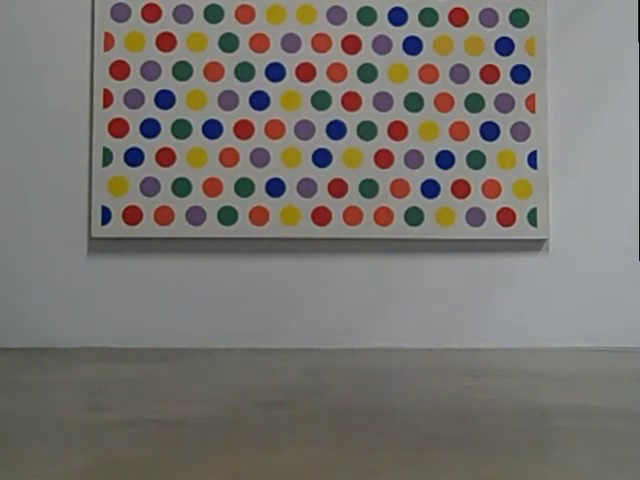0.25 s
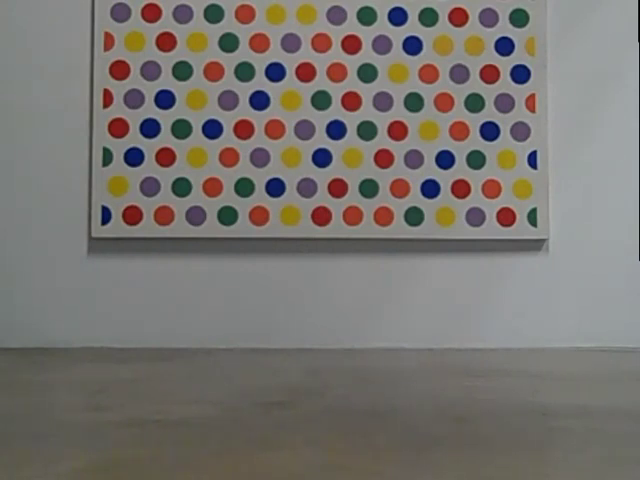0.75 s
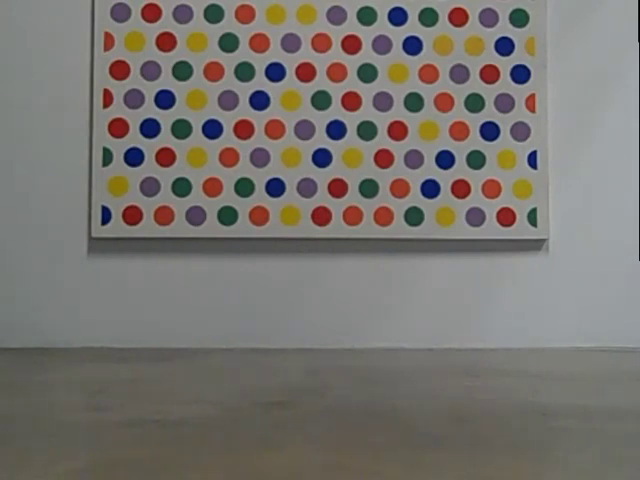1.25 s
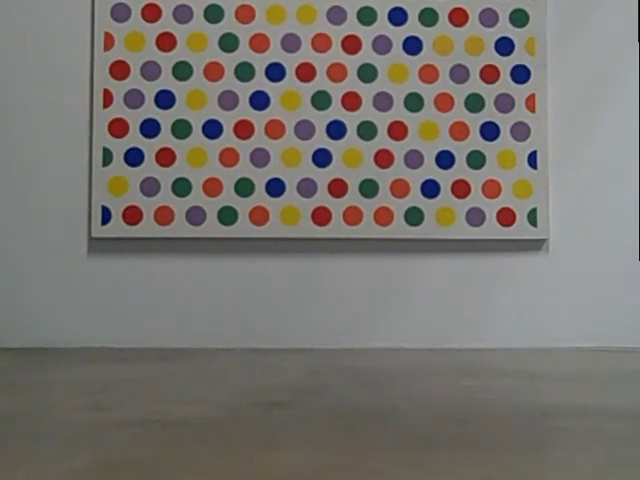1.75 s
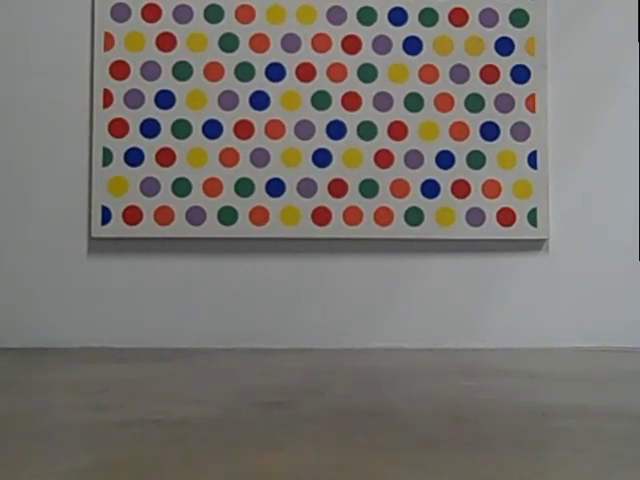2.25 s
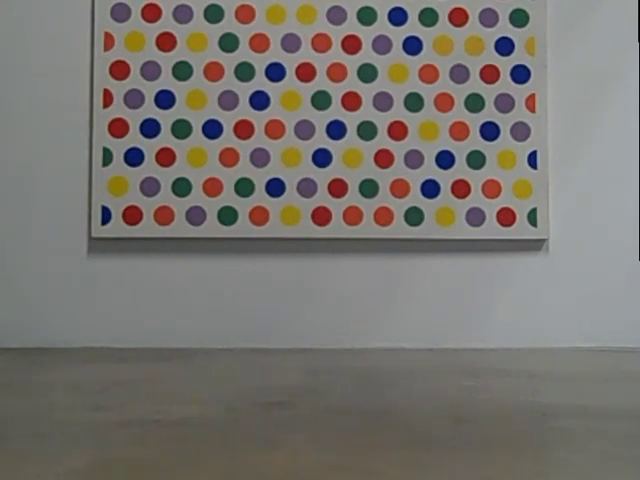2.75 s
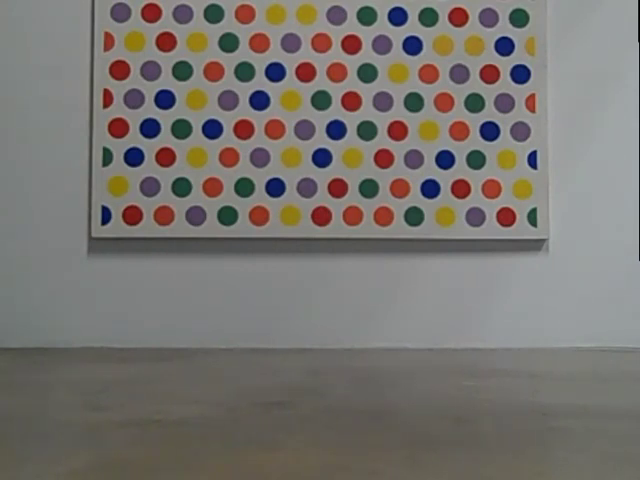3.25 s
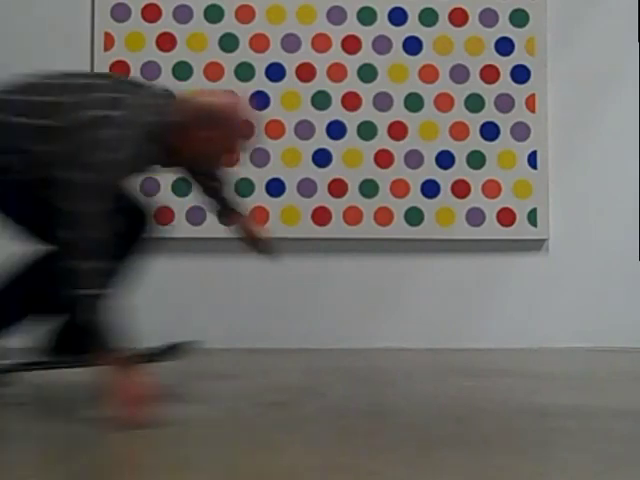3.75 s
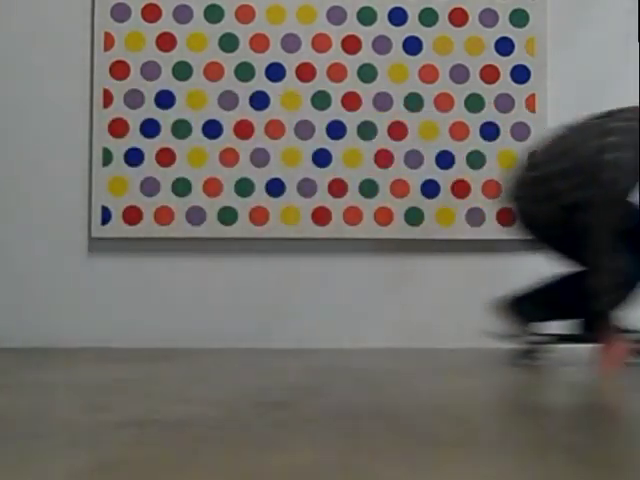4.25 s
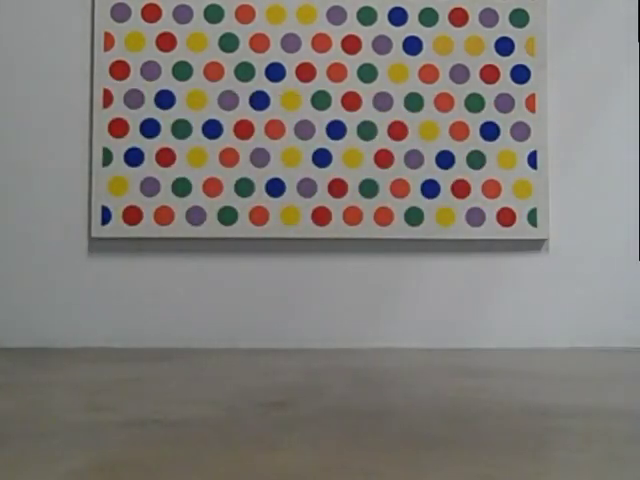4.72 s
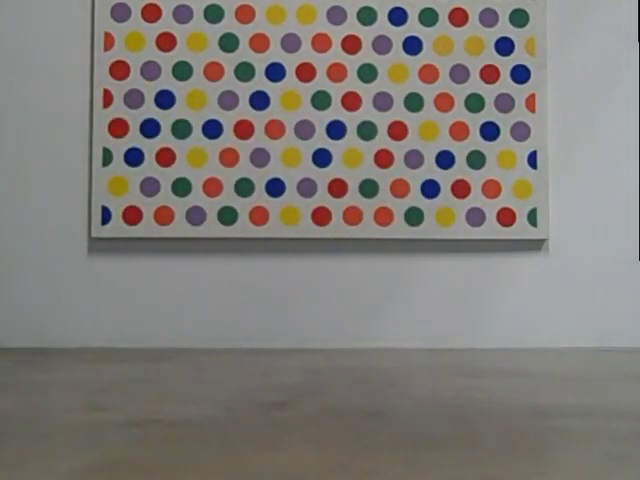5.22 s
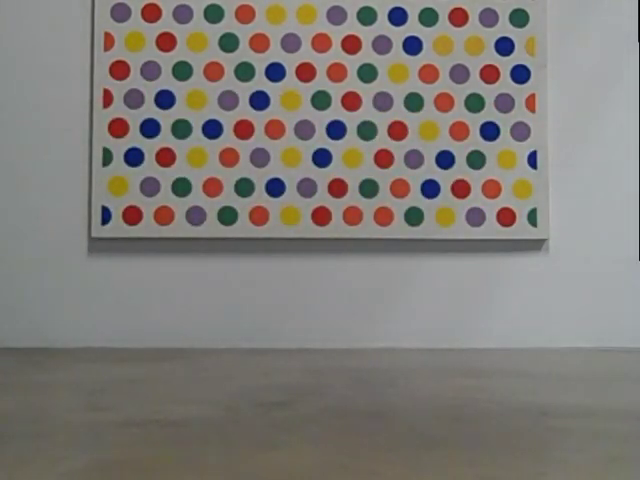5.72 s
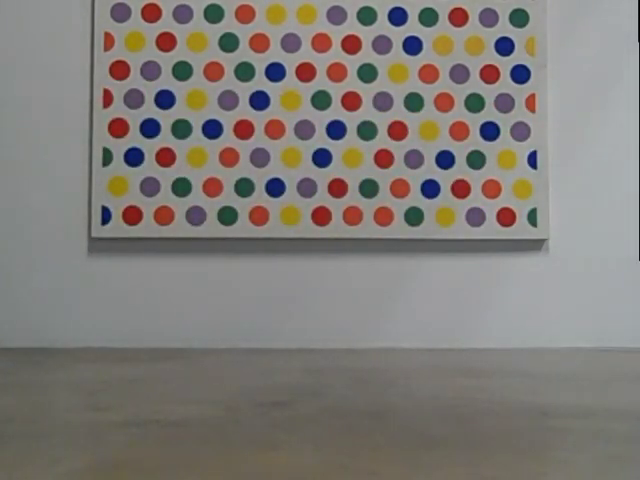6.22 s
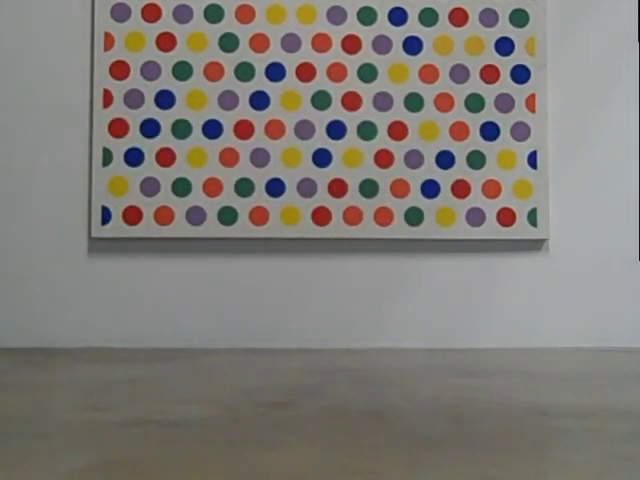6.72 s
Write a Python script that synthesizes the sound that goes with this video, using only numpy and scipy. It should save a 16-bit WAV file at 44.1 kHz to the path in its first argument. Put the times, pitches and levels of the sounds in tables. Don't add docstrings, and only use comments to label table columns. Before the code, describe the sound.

A large, bare hall with a polished concrete floor murmurs quietly and low. At 0.5 s a soft bump precedes faint skateboard rolling, and a dry axle gives a thin, fluttering, high squeak near 0.9 s. Light taps come around 1.75 s, then from 2.0 to 2.35 s the deck is knocked and set down in a dense, loud wooden clatter, with a second squeak and a surge of rolling whirr. A sole scuffs briefly at 2.6 s. Clacks at about 3.0-3.2 s lead into a short, harsh rubber skid, trailing off lightly. The wheels then roll with a lighter drone and gritty hiss until 4.7 s, when they clack twice over a floor joint with a low boom. The whirr swells, then drops gradually in pitch and fades toward 7 s. Close stereo microphones catch sharp detail and a long, ringing echo.

```python
import sys
import numpy as np
from scipy import signal
from scipy.io import wavfile

SR = 44100
rng = np.random.default_rng(int(sys.argv[2]) if len(sys.argv) > 2 else 0)


def field_ratio(decibels):
    return 10 ** (np.asarray(decibels, dtype=float) / 20)


def file_out(sig):
    cols = np.atleast_2d(sig).T
    lim = np.clip(cols, -1, 1)
    pcm = np.round(lim * 32767).astype(np.int16)
    wavfile.write(sys.argv[1], SR, pcm)


N = 307630
SECONDS = np.arange(N) / SR
JOINT_S = 4.71


def rms_one(x):
    return x / np.sqrt(np.mean(x ** 2) + 1e-20)


def in_time(rows):
    s, *columns = np.transpose(rows)
    return [np.interp(SECONDS, s, c) for c in columns]


def gate(start_s, end_s):
    return (SECONDS >= start_s) & (SECONDS <= end_s)


def at_hz(points, hz):
    f, values = np.array(points).T
    return np.interp(np.log(hz), np.log(f), values)


def swell(s, db, attack_s, hold_s, fall_db_per_s):
    rise = 30 * np.maximum(s - SECONDS, 0) / max(attack_s, .003)
    fall = fall_db_per_s * np.maximum(SECONDS - s - hold_s, 0)
    return db - rise - fall


def drift(rate_hz):
    r = np.exp(-2 * np.pi * rate_hz / SR)
    smooth = signal.lfilter([1], [1, -2 * r, r * r], rng.standard_normal(N + SR))
    return rms_one(smooth[SR:])


def resonances(x, modes):
    out = 0
    for k, (hz, width, db) in enumerate(modes):
        r = np.exp(-np.pi * width / SR)
        b = field_ratio(db) * (1 - r * r) / 2 * np.array([1, 0, -1])
        a = [1, -2 * r * np.cos(2 * np.pi * hz / SR), r * r]
        out = out + (-1) ** k * signal.lfilter(b, a, x + 1e-18)
    return out


def grains(per_s, spread_db):
    sizes = field_ratio(spread_db * np.minimum(rng.exponential(1, N), 4)) * rng.choice([-1, 1], N)
    return rms_one(sizes * (rng.random(N) < per_s / SR))


def bands(size, shape):
    # f/Hz, likeness/1
    likeness = [(60, 0.916), (150, 0.98), (370, 1), (930, 0.93), (2330, 0.66), (5820, 0.026), (14500, 0.1)]
    out, edges = 0, 25 * 2 ** np.arange(0, 9.6, .5)
    white = rng.standard_normal((2, 2, size))
    for k, (low, high) in enumerate(zip(edges, edges[1:])):
        band = signal.butter(2, [low, high], "band", fs=SR, output="sos")
        mid, side = signal.sosfilt(band, white[k % 2])
        hz = np.sqrt(low * high)
        alike = np.clip(at_hz(likeness, hz), 0, 1)
        out = out + shape(hz) * (np.sqrt(1 + alike) * mid + np.sqrt(1 - alike) * side * [[1], [-1]])
    return out


def spread(mid, side):
    high_pass = signal.butter(2, 2200, "high", fs=SR, output="sos")
    side = field_ratio(-1.0) * signal.sosfilt(high_pass, side) + field_ratio(-26) * side
    return np.array([mid + side, mid - side])


def air_tone():
    # f/Hz, level/dB (per Hz)
    air_colour = [(15, -45), (25, -37), (65, -8.5), (237, -12), (392, -7), (2200, -24), (7030, -54),
                  (14000, -60.5)]
    return field_ratio(-47) * rms_one(bands(N, lambda hz: field_ratio(at_hz(air_colour, hz))))


def footfall():
    s, db, hz, half_s = 7, -55, 32, 0.2
    return field_ratio(db) * np.exp(-((SECONDS - s) / half_s) ** 2) * np.sin(2 * np.pi * hz * SECONDS)


def boom():
    # f/Hz, width/Hz, level/dB
    slab = [(62.5, 50, -2.5), (92, 46, 0.5)]
    level = field_ratio(swell(JOINT_S, -42, attack_s=.03, hold_s=0.2, fall_db_per_s=18))
    return level * rms_one(resonances(resonances(rng.standard_normal(N), slab), slab))


def squeaks():
    # t/s (peak), level/dB, swell/s, fall/(dB per s)
    axle_squeaks = [
        (.86, -33.5, 0.117, 51),
        (2.14, -37, .12, 53),
    ]
    start_hz, full_hz, swell_db = 3200, 3265, 5.5
    level, climb = 0, 0
    for s, db, swell_s, fall in axle_squeaks:
        rise = np.clip(1 + (SECONDS - s) / swell_s, 0, 1)
        level = level + field_ratio(swell(s - swell_s, db, 0.061, swell_s, fall) - swell_db * (1.5 - rise))
        climb = np.where(SECONDS > s - 2 * swell_s, rise, climb)
    hz = start_hz + (full_hz - start_hz) * climb
    phase = 2 * np.pi * np.cumsum(hz * (1 + .012 * drift(130))) / SR
    flutter = field_ratio(3 * drift(110))
    return level * flutter * (np.sin(phase) + field_ratio(-22.5) * np.sin(2 * phase))


def scuffs():
    # t/s, level/dB, attack/s, hold/s
    drags = [
        (1.927, -42, .08, 0.035),
        (2.608, -34.5, 0.064, .04),
        (2.977, -39, 0.14, .005),
        (3.08, -34.5, .01, 0.0089),
        (3.139, -33, 0.038, 0.0096),
        (3.177, -19.5, 0.015, .008),
        (3.213, -18.5, 0.031, 0.1),
        (3.367, -43, .02, .02),
        (3.527, -38.5, 0.07, 0.1),
    ]
    # f/Hz, width/Hz, level/dB
    sole = [(1710, 420, 3.5), (4050, 3400, -4.5), (6700, 13200, -2.5), (11400, 2700, 2.5)]
    level = sum(field_ratio(swell(*row, fall_db_per_s=375) + 4.0) for row in drags)
    mid, side = (level * rms_one(resonances(grains(12000, spread_db=4.5), sole)) for port in range(2))
    return spread(mid, 0.5 * side)


def skid():
    # multiple/1, level/dB
    orders = [(1, -1), (2, -4), (3, -2.5), (4, -23), (5, -13.5), (6, -20.5)]
    # f/Hz, width/Hz, level/dB
    torn = [(490, 120, -13), (1098, 140, 5), (1626, 170, 4.5), (2460, 370, -9), (12100, 2700, -25.5)]
    start_s, peak_s, drag_end_s = 3.18, 3.255, 4.62
    slips_hz = np.where(SECONDS < 3.213, 425, 518)
    phase = 2 * np.pi * np.cumsum(slips_hz * (1 + .025 * drift(80))) / SR
    stack = 0
    for k, db in orders:
        stack = stack + field_ratio(db + 4 * drift(60)) * np.sin(k * phase)
    noise = field_ratio(-1.5) * rms_one(resonances(rng.standard_normal(N), torn))
    bite_db = swell(start_s, -14, attack_s=0.024, hold_s=.19, fall_db_per_s=461)
    bite = field_ratio(bite_db - 80 * abs(SECONDS - peak_s))
    drag = gate(start_s, drag_end_s) * field_ratio(-34.5 - 4 * (SECONDS - start_s))
    return (bite + drag) * (stack + noise)


def rolling(rumble_db, drone_db, hiss_db):
    # f/Hz, width/Hz, level/dB
    bending = [(86.2, 79, -4.5), (116.3, 83, 0), (184, 80, -0.5), (245.3, 133, -2), (323, 116, -2.5)]
    # f/Hz, width/Hz, level/dB
    wheels = [(372, 141, -7), (520, 80, -0.5), (700, 127.6, -3.5), (1000, 333, -8.5), (1333, 338, -9),
              (1730, 372, -12), (2420, 1405, -26.5)]
    # f/Hz, width/Hz, level/dB
    grit = [(3750, 667, -4), (6480, 8300, 0), (10860, 3400, 4.5)]
    rumble = rms_one(resonances(resonances(grains(1500, spread_db=2.5), bending), bending))
    drone = rms_one(resonances(grains(5000, spread_db=2.2), wheels))
    hiss = rms_one(resonances(grains(9000, spread_db=3.5), grit))
    return field_ratio(rumble_db) * rumble + field_ratio(drone_db) * drone + field_ratio(hiss_db) * hiss


def whirr(hz, level_db):
    phase = 2 * np.pi * np.cumsum(hz) / SR
    band, octave = [drift(90 * k) * np.sin(k * phase) + drift(90 * k) * np.cos(k * phase) for k in (1, 2)]
    speeding_up = np.clip(np.gradient(hz) * SR / 1000, 0, 1)
    return field_ratio(level_db) * (band + field_ratio(-12 + 7.5 * speeding_up) * octave)


def roll():
    # t/s, level/dB (drone), f/Hz (whirr)
    ride = [(0, -45.5, 520), (.5, -47.5, 520), (.7, -33, 520), (1.0, -36, 520), (1.3, -34.5, 520),
            (1.75, -37.5, 600), (1.98, -28, 1000), (2.3, -20, 802), (2.7, -29, 691.6), (3.05, -25.5, 681),
            (3.4, -42, 621), (3.75, -39.5, 640), (4.0, -33, 640), (4.62, -33.5, 655), (4.8, -30, 700),
            (5.4, -36, 683), (6.25, -38.5, 653.6), (6.98, -39, 623)]
    # t/s, level/dB, hold/s
    loaded = [
        (0.664, -41, 0.94),
        (1.88, -40.5, 0.98),
        (4.75, -37.5, 0.33),
        (5.5, -57, 1.5),
    ]
    # t/s, hold/s
    dusty = [
        (4.107, 0.58),
        (5.703, .4),
    ]
    drone_db, hz = in_time(ride)
    dust = sum(field_ratio(swell(s, 0, 0.11, hold_s, 200)) for s, hold_s in dusty)
    hiss_db = -60.5 + 1.06 * (drone_db + 34.5) + 4 * dust
    rumble_db = np.max([swell(s, db, 0.16, hold_s, 75) for s, db, hold_s in loaded], axis=0)
    whirr_db = drone_db - 5.5 - 26 * gate(3.3, 4.66)
    jolt_db = swell(JOINT_S, -26, attack_s=.03, hold_s=0.039, fall_db_per_s=24)
    whirr_db = np.maximum(whirr_db, jolt_db)
    flutter = drift(14.0)
    rumble_db = rumble_db + 1.2 * drift(8)
    levels = rumble_db, drone_db + 0.71 * flutter, hiss_db + 1.2 * flutter
    mid, side = (rolling(*levels) + whirr(hz, whirr_db) for port in range(2))
    return spread(mid, side)


def knocks(blows, rattle_s, click):
    # f/Hz, width/Hz, level/dB
    thud_modes = [(45, 19.1, -18), (79, 28, -5.5), (104, 23, 2), (181, 64, -2.5), (287, 145, -8)]
    # f/Hz, width/Hz, level/dB
    deck_modes = [(384, 39, -15), (520, 85, 2.5), (693, 85, -3.5), (1027, 518, -3), (1216, 160, 2),
                  (1577, 295, -8), (2380, 630, -13)]
    # f/Hz, width/Hz, level/dB
    crack_modes = [(2840, 1100, -2), (7240, 3600, 1), (11400, 4000, -1)]
    thud, deck, crack, rings = np.zeros((4, N + SR))
    after = np.arange(SR // 3) / SR
    envelope = np.exp(-(after / rattle_s) ** 2) * (1 - np.exp(-after / 0.0011))
    for s, peak_db, thud_db, crack_db, ring_hz in blows:
        start = round(s * SR)
        at = slice(start, start + len(after))
        blow = 0.13 * rng.standard_normal(len(after)) * envelope
        blow[0] += click
        thud[start] += field_ratio(thud_db + 47.0)
        deck[at] += field_ratio(peak_db + 16) * blow
        rings[at] += resonances(field_ratio(peak_db + 21.5) * blow, [(ring_hz, 110, 0)])
        crack[at] += field_ratio(crack_db + 14.5) * blow
    struck = resonances(thud, thud_modes) + resonances(deck, deck_modes) + resonances(crack, crack_modes)
    return (struck + rings)[:N]


def bumps():
    # t/s, level/dB (peak), level/dB (thud), level/dB (crack), f/Hz (loudest ring)
    loose_bumps = [(0.503, -27.5, -44, -63, 464), (1.079, -30, -33, -51.5, 400),
                   (1.782, -21.5, -34, -42, 855), (2.031, -13, -18, -37, 475), (2.14, -17, -15.5, -48, 546),
                   (2.19, -6.5, -18, -25, 386.5), (2.224, -3, -18, -27, 690), (2.308, -3, -25, -22.5, 1080),
                   (2.346, 1.5, -24, -24.5, 503), (3.082, -10, -31, -49, 737.2),
                   (3.139, -6.5, -31, -35, 410), (3.176, -4, -33, -36, 416), (4.674, -12.5, -23, -27, 655),
                   (4.697, -8, -27, -43, 606), (4.802, -13.5, -27, -34, 655), (4.829, -14, -23, -57, 634)]
    return knocks(loose_bumps, rattle_s=0.04, click=0.31)


def clacks():
    # t/s, level/dB (peak), level/dB (thud), level/dB (crack), f/Hz (loudest ring)
    hard_clacks = [
        (1.753, -26, -47, -43, 522),
        (2.054, -6, -25, -27.5, 464),
        (2.08, -6.5, -21, -27.5, 410),
        (2.197, -2, -16, -42, 420),
        (2.319, 1.5, -19, -25, 480),
        (2.969, -18, -30.5, -43, 716),
        (3.066, -5, -24.5, -26, 655),
        (4.678, -7, -47, -24.5, 830),
        (4.705, -10, -34, -35, 604),
        (4.786, -6.5, -31, -23, 404),
    ]
    return knocks(hard_clacks, rattle_s=.0105, click=1.93)


def hall(steady, dragged, sudden):
    # f/Hz, t60/s
    ring_time = [(60, 0.28), (150, 2.35), (400, 2.62), (800, 3.82), (1500, 2.95), (3000, 2.16),
                 (6000, 0.62), (12000, 0.36)]
    after = np.arange(SR * 4) / SR
    soon = after[:SR // 4]
    near = bands(len(soon), lambda hz: field_ratio(-60 * soon / (.045 * at_hz(ring_time, hz))))
    near = field_ratio(-4.5) * near / np.sqrt(np.sum(near[0] ** 2))
    near[:, 0] += 1.1
    tail = bands(len(after), lambda hz: field_ratio(-60 * after / at_hz(ring_time, hz)))
    tail = tail * (1 - np.exp(-after / 0.0031))
    feed = field_ratio(-5.0) * steady[0] + field_ratio(-4.5) * dragged[0] + sudden
    close = steady + dragged + signal.fftconvolve(sudden[None], near, axes=1)[:, :N]
    return close + field_ratio(-42) * signal.fftconvolve(feed[None], tail, axes=1)[:, :N]


def scene():
    dragged = scuffs() + skid() + squeaks()
    sudden = bumps() + clacks() + footfall()
    return air_tone() + boom() + hall(roll(), dragged, sudden)


def band_limit(x):
    return signal.sosfilt(signal.butter(12, 14600, fs=SR, output="sos"), x)


def record(dry):
    # f/Hz, level/dB
    left_port = [(100, 0.5), (2300, -2.5), (4500, 5), (6200, 6), (8200, 7.5), (9800, -10), (12000, -13.5),
                 (14300, -6)]
    # f/Hz, level/dB
    right_port = [(100, 1), (2300, -4), (4500, 0), (6400, 11), (7800, -2.5), (9800, -18.5), (12000, -33),
                  (14300, -20)]
    hz = np.maximum(np.arange(257) * SR / 512, 20)
    heard = []
    for side, colour in zip(dry, (left_port, right_port)):
        doubled = signal.firwin2(511, np.linspace(0, 1, 257), field_ratio(2 * at_hz(colour, hz)))
        heard.append(signal.fftconvolve(side, signal.minimum_phase(doubled))[:N])
    rounded = .9 * np.tanh(np.array(heard) / .9)
    top_cut = signal.cheby2(20, 60, 14900, fs=SR, output="sos")
    return band_limit(signal.sosfilt(top_cut, rounded))


dry = scene()
out = record(dry)
file_out(out)
```